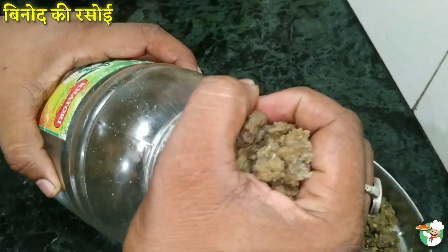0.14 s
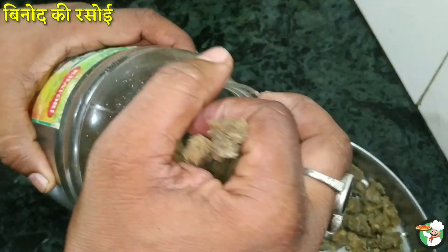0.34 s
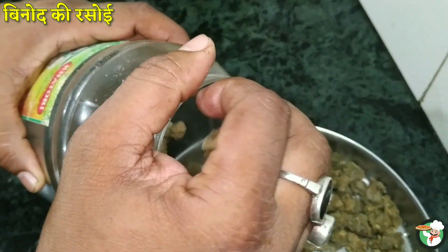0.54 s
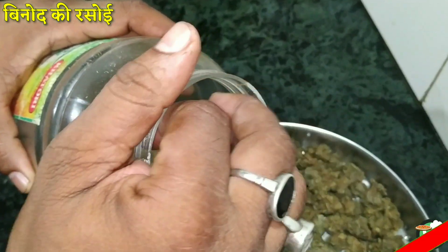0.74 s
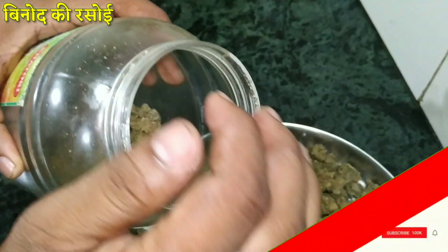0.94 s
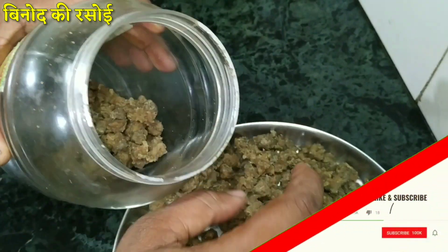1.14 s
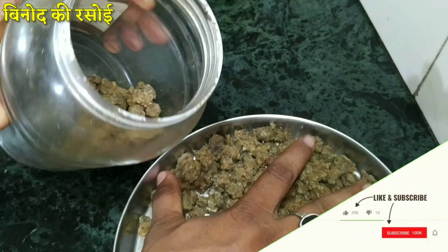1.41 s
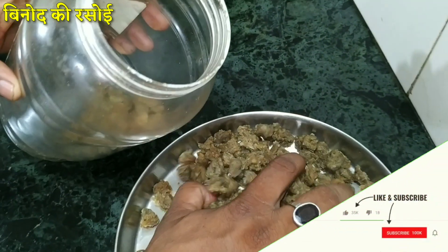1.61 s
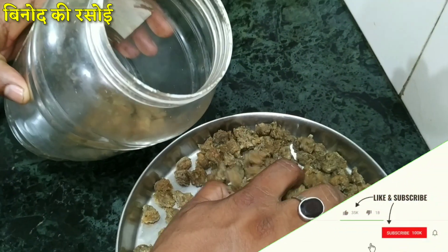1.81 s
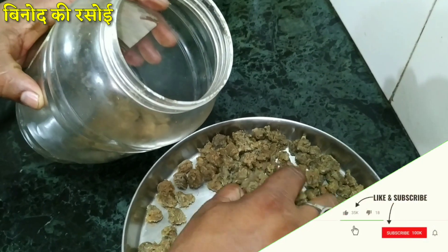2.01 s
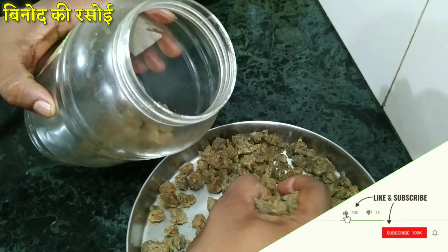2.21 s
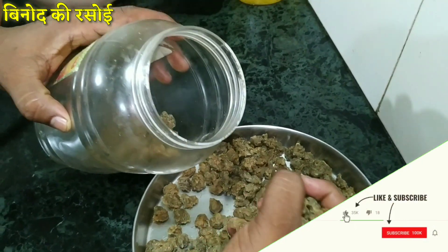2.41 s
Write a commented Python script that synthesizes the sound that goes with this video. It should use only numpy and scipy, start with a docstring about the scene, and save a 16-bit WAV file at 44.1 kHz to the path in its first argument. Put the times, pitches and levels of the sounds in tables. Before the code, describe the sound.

A handful of dry, hard pieces tumbles into a thin plastic jar, clacking and thumping hollowly. After a single knock on the jar, more pieces crunch and click as they are gathered on a steel plate, heard nearby in a quiet kitchen.

```python
"""Hard dried nuggets fall into a plastic jar in a small kitchen, clacking on its thin wall.
Their impacts excite the modes of the wall, thud on the bottom and draw a hollow note from the enclosed
air, a Helmholtz resonator. The jar takes one knock. Then a hand rakes the next handful together on a
steel plate, where many small contacts merge into a dense dry crunch, over faint room noise."""
import sys
import numpy as np
from scipy import signal
from scipy.fft import rfft, irfft, next_fast_len
from scipy.io import wavfile

SR = 44100
rng = np.random.default_rng(int(sys.argv[2]) if len(sys.argv) > 2 else 0)


def transcribe(u):
    """Save the signal u as a 16-bit wav file named by the first command-line argument.

    u: samples, shape (n,) or (channels, n), limited to [-1, 1]; the rate is SR.
    q: integer samples, one column per channel.
    """
    v = np.clip(np.atleast_2d(u).T, -1, 1)
    q = np.round(v * 32767).astype(np.int16)
    wavfile.write(sys.argv[1], SR, q)


N = 112454
TIME = np.arange(N) / SR
BURIED_DB = -12  # weakens the reflections of sounds made inside the heap or the jar

# Landings on the bottom of the jar. Each row: start in seconds, air note level in dB, air note
# frequency in Hz (lower while the hand covers the mouth), thud level in dB.
BOTTOM_IMPACTS = [(0.206, -51, 247, -38), (0.239, -53, 242, -30.5), (0.27, -20.5, 228, -42),
                  (0.346, -8, 240.7, -9), (.392, -14, 224, -15.5), (0.431, -12.5, 229.2, -21),
                  (0.464, -14.5, 225.7, -19), (.530, -18, 230.3, -14.5), (0.563, -16.5, 226, -18.5),
                  (.600, -18.5, 210, -23.5), (0.631, -19, 220.6, -13.5), (0.7, -59, 240, -16),
                  (0.774, -28.5, 230.4, -21.5), (0.874, -26, 240, -34), (0.914, -27, 253, -21),
                  (.933, -15, 238.5, -16.5), (.970, -19.5, 243, -25.5), (1.012, -22.5, 238.8, -24),
                  (1.062, -30, 251, -18.5), (1.198, -41, 277, -45), (1.253, -38.5, 276, -33.5)]


def jar_wall(spot_q=7.9, spot_db=2, crack_db=-2, treble_hz=4500):
    """Impact excitation: clacks and tumbling crumbs shake the wall and set its damped modes ringing."""
    # Each row: start in seconds, level in dB, treble gain in dB, pitch of the struck spot in Hz.
    clacks = [(.020, -33.5, 8.5, 2680), (.207, -8, -5.5, 2170), (.229, -12.5, 2.5, 2120),
              (.249, -9, -6, 2100), (.264, -6, -17, 1950), (.275, -5.5, -14, 1830), (.286, -16, -6, 1830),
              (.300, -9, -2, 2320), (.347, -16, 9.5, 1930), (.357, -8.5, -8, 2800), (.367, -8, 4, 3450),
              (.403, -5.5, -12, 2130), (.418, -6.5, -3, 3160), (.449, -19, -4, 2250), (.462, -6, -11, 1900),
              (.471, -5, -11, 2460), (.533, -13, 0, 2260), (.541, -13.5, 7.5, 2480),
              (.551, -11.5, -17, 2220), (.564, -22, -14, 2450), (.597, -6.5, 1, 3780),
              (.632, -17, 11, 2100), (.641, -7, 2, 4000), (.656, -13.5, 5, 2260), (.702, -20, 6, 4250),
              (.708, -9.5, 2.5, 2070), (.725, -13.5, 9.5, 2510), (.806, -17, 13, 5500),
              (.818, -18.5, 9.5, 6140), (.8325, -16, 9.5, 2150), (.900, -13.5, 4.5, 2280),
              (.934, -28, -7, 1830), (.975, -31.5, 11.5, 1740), (1.014, -27.5, 5.5, 2600),
              (1.064, -31, 12.5, 1940), (1.125, -29, -16, 2000), (1.199, -29.5, -22, 2160)]
    # Small pieces tumbling between the clacks. Each row: time in seconds, level in dB.
    tumbling = [(0, -41), (.05, -38), (.12, -50.5), (.203, -40), (.212, -23), (.27, -19.5), (.33, -20),
                (.42, -19.5), (.51, -22), (.55, -17), (.61, -31.5), (.66, -25.5), (.755, -34),
                (.778, -20.5), (.795, -35.5), (.83, -34.5), (.89, -36.5), (.915, -23), (1.0, -41.5),
                (1.05, -46.5), (1.068, -26), (1.10, -46), (1.16, -62), (1.38, -75)]
    # Response of the thin plastic. Each row: frequency in Hz, relative level in dB.
    wall_spectrum = [(100, -53), (250, -12), (400, -6.5), (570, -13.5), (950, -11), (1250, -7.5),
                     (1600, -8), (1900, -0.5), (2300, -2), (3000, -9.5), (4000, -8.5), (5500, -14),
                     (7500, -24.5), (10800, -29.5), (12500, -34.5), (16000, -47)]
    # Each row: natural frequency in Hz, level in dB, time to decay by 60 dB in seconds.
    jar_modes = [(375, -22.5, 0.23), (724, -18, 0.082), (951.5, -19, 0.16), (1097, -23, 0.42),
                 (1256, -25.5, 0.4), (1567, -18, 0.086), (1777, -15, 0.067), (1988, -19.5, 0.35),
                 (2198, -21.5, 0.4), (3320, -24, 0.11), (3980, -36, 0.3)]
    blows = grains(tumbling, per_s=700, spread_db=1, t60=0.012, click_db=3, ring_db=5)
    for start, db, treble_db, hz in clacks:
        clack = burst(t60=0.013, attack_s=0.0006)
        clack += amp(crack_db) * burst(t60=0.0073, cover_db=BURIED_DB)  # the first hard instant
        dull = signal.lfilter(*signal.butter(1, treble_hz, fs=SR), clack)
        treble = amp(treble_db) * (clack - dull)
        spot = amp(spot_db) * signal.lfilter(*signal.iirpeak(hz, spot_q, fs=SR), clack)
        add(blows, start, amp(db) * (dull + treble + spot))
    ringing = 0
    for hz, db, t60 in jar_modes:
        phase = rng.uniform(0, 2 * np.pi, (2, 1))
        mode = dying(t60) * np.sin(2 * np.pi * hz * TIME + phase)
        ringing += amp(db) * unit_energy(mode)
    return colour(blows, wall_spectrum) + signal.fftconvolve(blows, ringing, axes=1)[:, :N]


def jar_air(t60=0.25, attack_s=0.0043, pan_db=1.75):
    """Helmholtz resonance: each landing pumps the air in the jar, which swings in its mouth."""
    out = np.zeros((2, N))
    envelope = dying(t60) * (1 - np.exp(-TIME / attack_s))
    pan = amp([[-pan_db], [pan_db]])
    for start, db, hz, _ in BOTTOM_IMPACTS:
        add(out, start, amp(db) * pan * envelope * np.sin(2 * np.pi * hz * TIME))
    return out


def jar_bottom():
    """Damped vibration: the bottom answers each landing with a short, low thud."""
    # Response of the bottom. Each row: frequency in Hz, relative level in dB.
    thud_spectrum = [(100, -33.5), (190, -12), (295, 3), (400, -0.5), (500, -1.5), (580, -12), (720, -2.5),
                     (950, -5), (1300, -13.5), (2500, -6), (8000, -54)]
    thuds = [(start, db) for start, _, _, db in BOTTOM_IMPACTS]
    return colour(hits(thuds, t60=0.063, attack_s=0.0025), thud_spectrum)


def jar_knock(start_s=1.255, db=-19):
    """Impulse response: one sharp knock excites the jar's resonances all at once."""
    # Response of the knocked jar. Each row: frequency in Hz, relative level in dB.
    knock_spectrum = [(200, -34), (550, -26), (900, 5.5), (1250, 1.5), (1550, -5), (2100, 10.5),
                      (3000, -11.5), (4200, 4.5), (5000, -13.5), (6300, -11), (8000, -32), (16000, -42)]
    return colour(hits([(start_s, db)], t60=0.074, attack_s=0.00048), knock_spectrum)


def raked_heap():
    """Granular friction: rough nuggets grind together and snap on the steel, which the heap damps."""
    # How hard the hand rakes. Each row: time in seconds, level in dB.
    raking = [(1.39, -69), (1.42, -27.5), (1.455, -39.5), (1.49, -29), (1.532, -28.5), (1.548, -17.5),
              (1.595, -20), (1.62, -15.5), (1.70, -17), (1.738, -17), (1.76, -22), (1.83, -19),
              (1.878, -13), (1.91, -15.5), (1.955, -16.5), (1.985, -18.5), (2.025, -23), (2.07, -15.5),
              (2.105, -19.5), (2.165, -14), (2.20, -24.5), (2.26, -27.5), (2.31, -36.5), (2.36, -31.5),
              (2.41, -53), (2.45, -38), (2.55, -69)]
    # Single nuggets striking the plate. Each row: start in seconds, level in dB.
    snaps = [(1.412, -22.5), (1.429, -22), (1.471, -27), (1.501, -23), (1.621, -12), (1.733, -12),
             (1.929, -26), (1.981, -9.5), (2.060, -9.5), (2.095, -33), (2.169, -40), (2.211, -12.5),
             (2.253, -18), (2.268, -19.5), (2.325, -20), (2.342, -43), (2.362, -18.5), (2.370, -20.5),
             (2.432, -28.5), (2.456, -46), (2.488, -40), (2.544, -36)]
    # Response of the heap on the plate. Each row: frequency in Hz, relative level in dB.
    heap_spectrum = [(100, -39), (300, -27.5), (600, -22.5), (1000, -14), (1500, -8), (2000, 1),
                     (2450, 2.5), (3100, -4), (4200, -5), (6000, -9.5), (8500, -14), (9500, -19),
                     (11000, -17.5), (12500, -26), (15000, -30), (16500, -36)]
    crunch = grains(raking, per_s=1700, spread_db=1.5, t60=0.0023, click_db=-0.5, ring_db=7)
    return colour(crunch + hits(snaps, t60=0.031, attack_s=0.002), heap_spectrum)


def grains(levels, per_s, spread_db, t60, click_db, ring_db, pieces=22, range_hz=(1558, 11780), q=21.6):
    """Shot noise: random contacts are dealt to pieces that click and ring, each size at its own pitch."""
    strengths = amp(spread_db * np.minimum(rng.exponential(1, N), 4)) * rng.choice([-1, 1], N)
    contacts = strengths * (rng.random(N) < per_s / SR)
    contacts /= np.sqrt(np.mean(contacts ** 2))
    contacts *= amp(np.interp(TIME, *np.transpose(levels)))
    owner = rng.integers(0, pieces, N)
    out = 0
    for piece, hz in enumerate(np.geomspace(*range_hz, pieces)):
        clicks = through(contacts * (owner == piece), burst(t60, cover_db=BURIED_DB))
        ring = signal.lfilter(*signal.iirpeak(hz, q, fs=SR), clicks)
        out += amp(click_db) * clicks + amp(ring_db) * ring
    return out


def hits(rows, t60, attack_s):
    """Superposition of impacts: one burst for each start in seconds and level in dB."""
    out = np.zeros((2, N))
    for start, db in rows:
        add(out, start, amp(db) * burst(t60, attack_s))
    return out


def burst(t60, attack_s=0, cover_db=0, early_db=-5.5, early_t60=0.075):
    """Modal overlap: dense modes decay as stereo noise, trailed by early reflections off the counter."""
    t = TIME[:SR // 4]
    direct = amp(-60 * t / t60)
    reflected = amp(early_db + cover_db - 60 * t / early_t60)
    fade = np.hypot(direct, reflected)
    attack = np.minimum((t + 1 / SR) / (attack_s + 1 / SR), 1)
    noise = rng.standard_normal((2, len(t))) * fade * attack
    return noise * np.sqrt(np.sum(fade ** 2) / np.sum(noise ** 2, axis=1, keepdims=True))


def kitchen(x, tail_db=-10):
    """Reverberation: reflections from the tiles add a faint tail."""
    return x + amp(tail_db) * through(x, burst(t60=0.18))


def room_noise(db=-43.5):
    """Stationary noise: a faint, steady background, strongest in the bass."""
    # Each row: frequency in Hz, relative spectral density in dB.
    noise_spectrum = [(20, -3), (40, 0.5), (55, -3), (75, 3.5), (100, -2), (150, -20), (195, 4),
                      (260, -9.5), (500, -8), (1000, -10.5), (1600, -8.5), (2100, -2), (2700, -12),
                      (5000, -15.5), (8000, -18), (15000, -24)]
    return amp(db) * colour(rng.standard_normal((2, N)), noise_spectrum)


def microphone_ports(x):
    """Mid-side stereo: two ports hear the bass alike and the treble differently."""
    # Each row: frequency in Hz, side level minus mid level in dB.
    stereo_width = [(60, -13), (250, -18.5), (700, -5), (1300, -1.5), (2400, 0.5), (15000, -1)]
    # Each row: frequency in Hz, left level minus right level in dB.
    balance = [(60, 0), (250, -2), (700, 2.5), (1300, 0), (2400, 1.5), (4000, 3.5), (8000, -2), (15000, -6)]
    size = 2 * next_fast_len(N)
    mid, side = rfft(x, size)
    width = amp(on_bins(stereo_width, size))
    lean = amp(on_bins(balance, size) / 2)
    left = (mid + width * side) * lean
    right = (mid - width * side) / lean
    return irfft(np.array([left, right]) / np.sqrt(1 + width ** 2))[:, :N]


def colour(x, spectrum):
    """Minimum-phase filtering: imposes a spectrum causally; white noise keeps its power."""
    size = 2 * next_fast_len(N)
    gain = amp(on_bins(spectrum, size))
    cepstrum = irfft(np.log(gain / np.sqrt(np.mean(gain ** 2))))
    response = np.exp(rfft(2 * cepstrum[:size // 2], size) - cepstrum[0])
    return irfft(rfft(x, size) * response)[..., :N]


def on_bins(spectrum, size):
    """Interpolation in log frequency: a spectrum's level in dB at every bin of a transform."""
    hz, db = np.transpose(spectrum)
    bin_hz = np.arange(size // 2 + 1) * SR / size
    return np.interp(np.log(bin_hz + 1), np.log(hz), db)


def through(x, response):
    """Convolution with a stereo response of unit energy."""
    return signal.fftconvolve(np.atleast_2d(x), unit_energy(response), axes=1)[:, :N]


def unit_energy(x):
    """Normalisation: the two channels have a mean energy of one."""
    return x / np.sqrt(np.sum(x ** 2) / 2)


def dying(t60):
    """Exponential decay from 1: falls 60 dB in t60 seconds, down to -120 dB."""
    return np.exp(-np.log(1000) * np.minimum(TIME / t60, 2))


def add(out, start_s, sound):
    """Superposition: mixes a sound in at its start time."""
    i = int(np.clip(start_s * SR, 0, N - 1))
    out[:, i:i + sound.shape[1]] += sound[:, :N - i]


def amp(db):
    """Amplitude ratio of a level in decibels."""
    return 10 ** (np.asarray(db) / 20)


def scene():
    """Linear mixing: jar and heap reverberate over the room noise, and the air note is added dry."""
    background = room_noise()
    impacts = jar_wall() + jar_bottom() + jar_knock() + raked_heap()
    return microphone_ports(kitchen(impacts) + background) + jar_air()


def record(dry, ceiling=0.71, cutoff_hz=16300):
    """Soft saturation rounds the peaks; a steep low-pass filter removes the highest treble."""
    lowpass = signal.cheby2(14, 70, cutoff_hz, fs=SR, output="sos")
    return signal.sosfilt(lowpass, ceiling * np.tanh(dry / ceiling))


dry = scene()
out = record(dry)
transcribe(out)
```